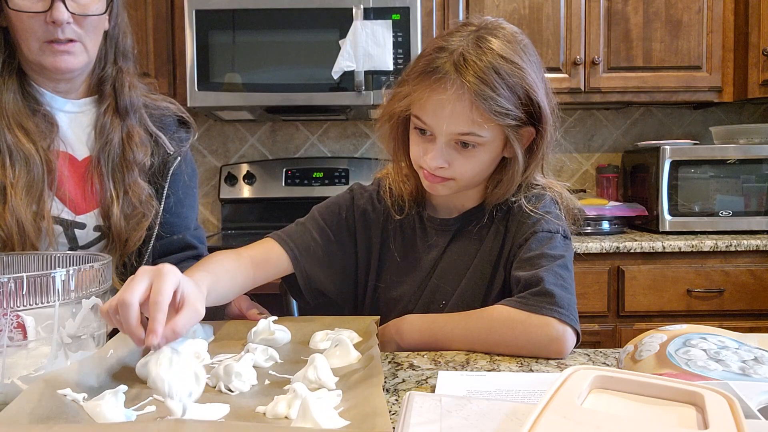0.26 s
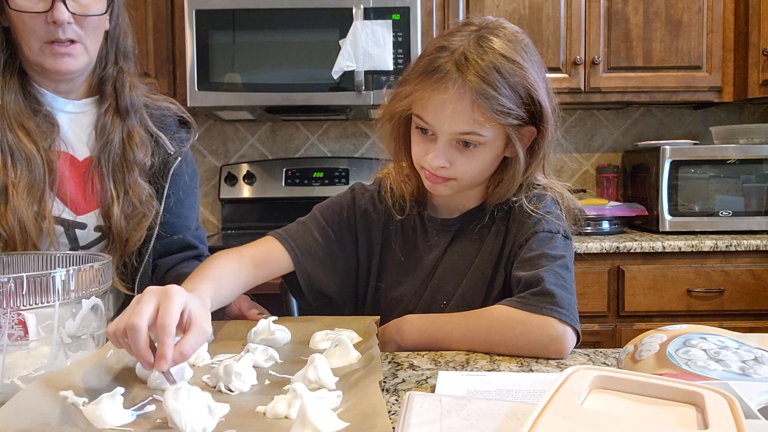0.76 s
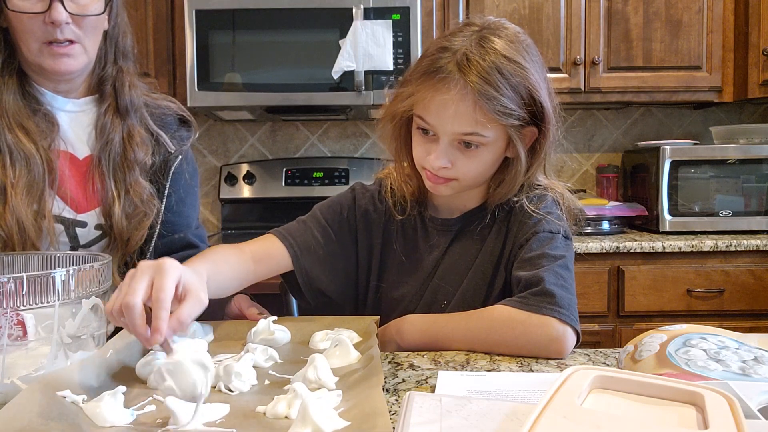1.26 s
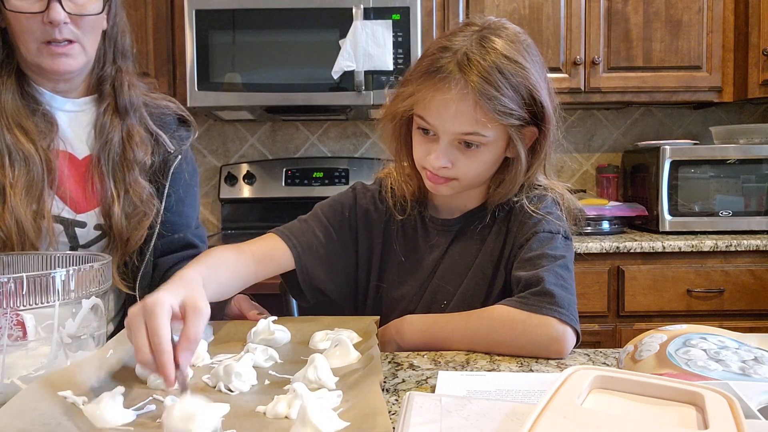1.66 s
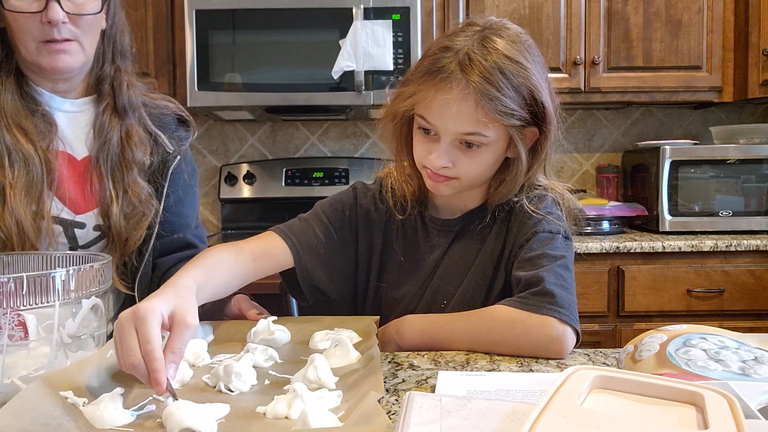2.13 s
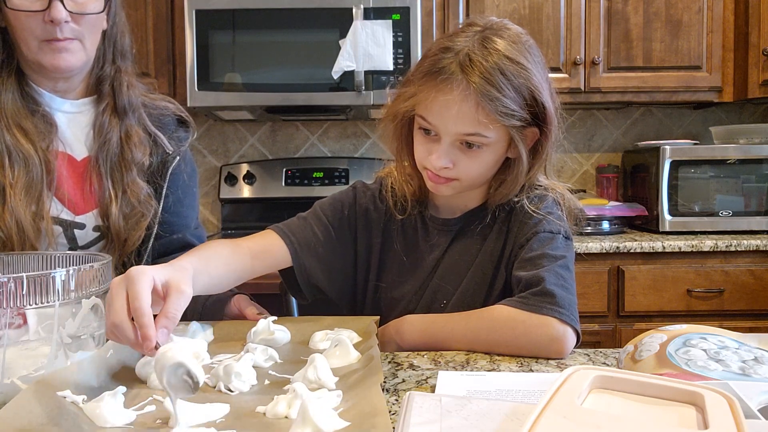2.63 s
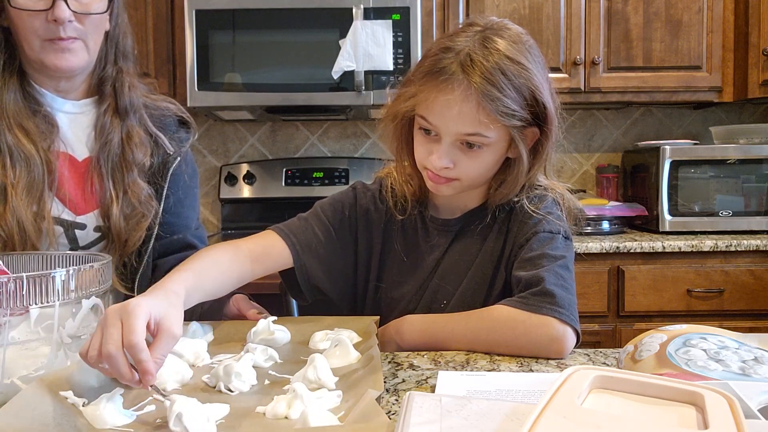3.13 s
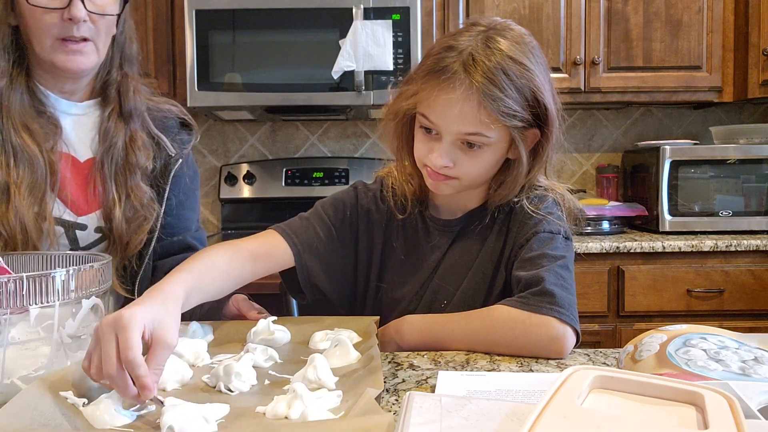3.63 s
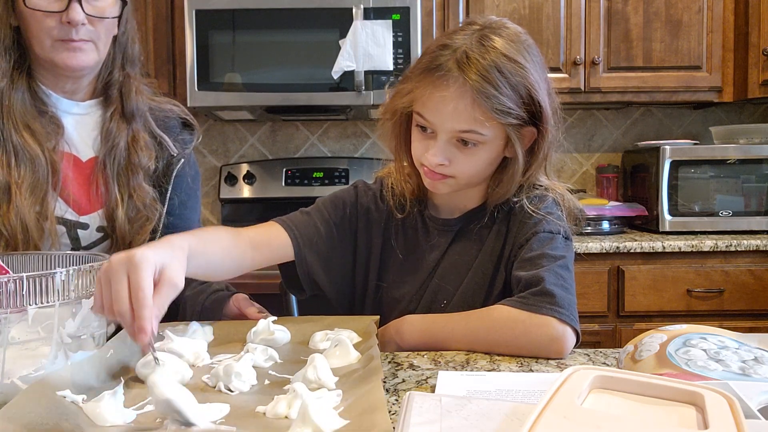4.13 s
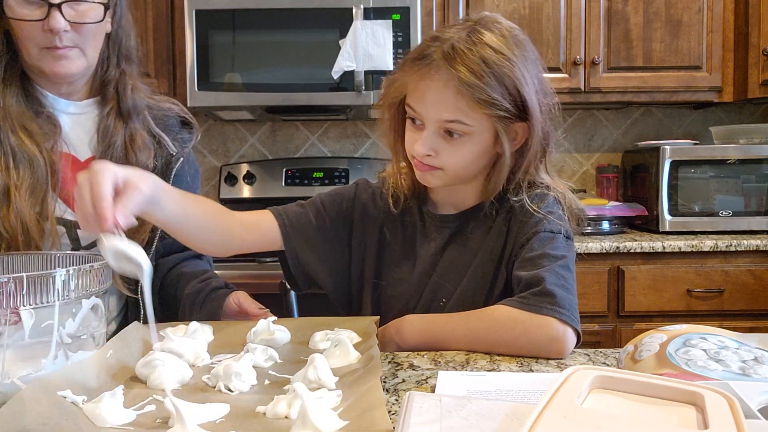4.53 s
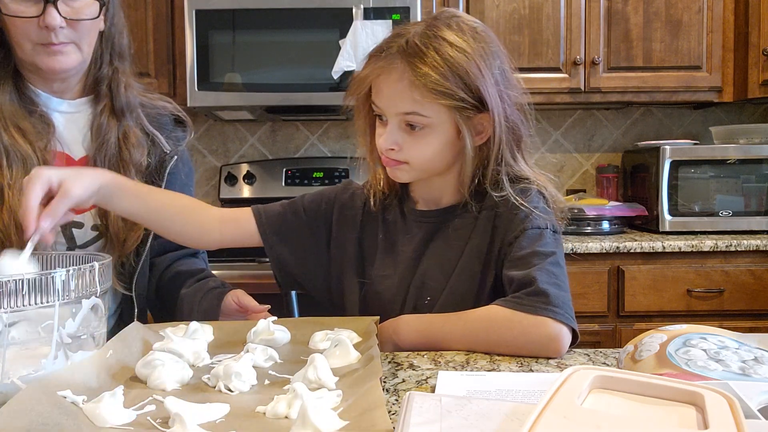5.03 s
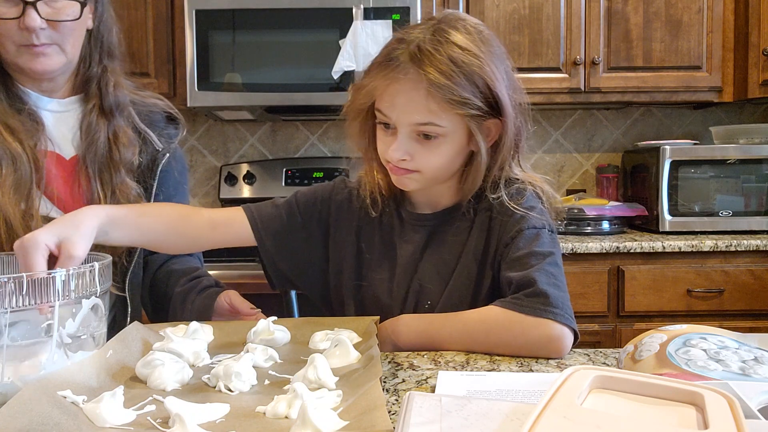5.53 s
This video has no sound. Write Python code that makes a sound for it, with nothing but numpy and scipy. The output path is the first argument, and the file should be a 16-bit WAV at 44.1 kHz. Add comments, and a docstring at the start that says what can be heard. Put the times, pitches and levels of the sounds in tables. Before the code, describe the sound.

Stereo, close microphone in a small, slightly echoing kitchen with a soft appliance hum. Small dry paper crackles come irregularly while a spoon drags over parchment, with one strong damped tap on the metal tray, quieter fidgeting, then several quick lighter taps. A pause follows, then a bright hollow clack of metal spoon on plastic bowl, weak ticks, and a very short faint squeaky rub near the end.

```python
"""A spoon works soft mixture off onto a parchment-lined baking sheet, close by on a kitchen counter.
The paper rustles (resonant crackle) and crinkles (runs of snaps); taps are damped clicks with the
ring of the metal sheet. Then the spoon knocks a plastic bowl, exciting the modes of both, and scrapes
it with a squeak of narrow noise bands. An appliance hums as slowly wavering sines over coloured noise.
Two ports pick up direct sound, a counter bounce and the echoes of the small room."""
import sys
import numpy as np
from scipy import signal
from scipy.fft import rfft, irfft
from scipy.io import wavfile
from scipy.ndimage import uniform_filter1d

SR = 44100
rng = np.random.default_rng(int(sys.argv[2]) if len(sys.argv) > 2 else 0)


def to_wav(sig):
    """Store sig (one row per channel, or 1-D mono) as 16-bit WAV at the path in sys.argv[1].

    Samples outside -1..1 are clipped; the rate is SR.
    """
    pcm = np.clip(np.atleast_2d(sig), -1, 1) * 32767
    pcm = np.round(pcm).astype(np.int16)
    wavfile.write(sys.argv[1], SR, pcm.T)  # frames by channels


N = 254816
TIME = np.arange(N) / SR

# Spectrum of a spoon's impact click. Each row: frequency in Hz, level in dB.
IMPACT_COLOUR = [(50, -37.5), (120, -24), (190, -28.5), (520, -17), (1100, -3), (2000, -2), (2900, -4.5),
                 (4800, -5.5), (7500, -8), (10000, -23), (15500, -27.5)]
# Impacts of the spoon on the bowl. Each row: start in seconds, relative levels of the wall's thud, the
# spoon's clink and the click in dB, tilt of the click in dB per octave, contact length in seconds.
BOWL_IMPACTS = [(5.2435, -34, -12, -13, -3, 0.025), (5.2597, -4, -0.5, -2.5, 6, 0.0049),
                (5.2672, -24, -22, -6.5, -3, 0.0024), (5.481, -33, -55.5, -33, -11.5, 0.0044),
                (5.4914, -26, -50, -21.5, -15, 0.0037), (5.732, -33, -51, -30, -14, 0.0029),
                (5.749, -32.5, -52, -38, -6.5, 0.0057)]


def amp(db):
    """Level as an amplitude ratio: 20 dB is a factor of ten."""
    return 10 ** (np.asarray(db) / 20)


def unit(x):
    """Energy normalisation: the squares sum to one."""
    return x / np.sqrt(np.sum(x ** 2) + 1e-20)


def read(points, hz):
    """Interpolation of a spectrum by straight lines over log frequency."""
    f, value = np.transpose(points)
    return np.interp(np.log(hz + 1), np.log(f), value)


def add(mix, s, sound):
    """Superposition: adds a sound into the mix from s seconds on."""
    part = mix[round(s * SR):][:len(sound)]
    part += sound[:len(part)]


def octaves(hz):
    """Spectral tilt axis: octaves from 2 kHz, held constant beyond 500 Hz and 12 kHz."""
    return np.log2(np.clip(hz, 500, 12000) / 2000)


def snap(colour, tilt_db, peak_hz=1500, peak_db=0, spread_ms=.25, size=2048):
    """Bending-wave dispersion: a causal click with one broad resonance, its treble arriving first."""
    hz = np.fft.fftfreq(size, 1 / SR)
    peak = peak_db / (1 + ((abs(hz) - peak_hz) / (0.14 * peak_hz)) ** 2)
    log_gain = np.log(amp(read(colour, abs(hz)) + tilt_db * octaves(abs(hz)) + peak))
    minimum_phase = np.conj(signal.hilbert(log_gain))
    # phase growing as the root of frequency: spread_ms is the delay at 1 kHz
    bend = 4 * np.pi * spread_ms * np.sign(hz) * np.sqrt(abs(hz) / 1000)
    click = np.fft.ifft(np.exp(minimum_phase - 1j * bend)).real
    return unit(click[:size // 2])


def grains(count, per_s, spread_db):
    """Stick-slip as a random point process: clicks of uneven size over a faint fizz."""
    size = amp(spread_db * np.minimum(rng.exponential(1, count), 4))
    sign = rng.choice([-1, 1], count)
    slips = rng.random(count) < per_s / SR
    return size * sign * (slips + .015)


def wander(step_s):
    """Slow random modulation: a curve that takes a new value every step, joined by lines."""
    knots = np.arange(2000) * step_s
    return np.interp(TIME, knots, rng.standard_normal(len(knots)))


def stroke(start, length):
    """Exponential growth and decay: the rustle swells as the spoon grips, holds, dies as paper relaxes."""
    grip_db_per_s, relax_db_per_s = 599.5, 379.5
    early = np.maximum(start - TIME, 0)
    late = np.maximum(TIME - start - length, 0)
    return amp(-np.minimum(grip_db_per_s * early + relax_db_per_s * late, 200))


def rustle(level_db=0, per_s=220, spread_db=2.0, clump_db=3, shift_db=4, peak_db=8):
    """Resonant filtering of crackle: the spoon drifts over paper patches, each with its own resonance."""
    # Spectrum of the spoon rubbing on paper. Each row: frequency in Hz, level in dB.
    rub_colour = [(60, -33.5), (200, -11), (600, -7), (1000, -4), (1450, -1), (2000, -4.5), (2700, -10.5),
                  (4200, -7.5), (7300, -14), (10000, -29), (15500, -34)]
    # Strokes of the sticky spoon dragging the paper. Each row: start in seconds, length in seconds,
    # relative level in dB, extra level of the treble in dB.
    drags = [(0, 0.011, -54, -1), (0.075, .05, -53, 0.5), (.17, 0.11, -49, 1.5), (0.373, 0.17, -47, -1.5),
             (0.601, 0.02, -51, -6), (0.783, 0.071, -50, -1.5), (0.937, 0.041, -49.5, -9.5),
             (0.99, 0.068, -44.5, 3.5), (1.118, 0.036, -46.5, 1), (1.214, 0.095, -69, -4),
             (1.374, 0.0057, -54, -5.5), (1.667, .024, -41, -3), (1.762, 0.1, -63, -7),
             (1.893, 0.012, -51, -0.5), (1.979, 0.015, -54, -2), (2.188, .025, -55.5, -2),
             (2.222, .07, -46.5, -1), (2.412, 0.019, -57, -1.5), (2.598, 0.042, -49.5, 0),
             (2.674, 0.018, -45.5, -1.5), (2.951, 0.071, -45, -1.5), (3.08, .08, -67, -3.5),
             (3.552, .05, -64, -3.5), (3.709, 0.029, -56.5, 2.5), (3.909, 0.065, -57.5, -2.5),
             (3.96, .12, -53, -1), (4.112, 0.033, -45.5, -0.5), (4.381, 0.031, -59.5, -12),
             (4.433, 0.027, -53, -0.5), (4.498, 0.054, -59.5, 2)]
    treble_hz = 2800  # above this lies the crisp part of the rustle

    clumps = amp(clump_db * wander(0.0096))
    crackle = 0
    for patch_hz in np.geomspace(1000, 3400, 6):
        slips = grains(N, per_s, spread_db) * clumps * amp(shift_db * wander(.04))
        crackle = crackle + signal.oaconvolve(slips, snap(rub_colour, 0, patch_hz, peak_db))[:N]
    # level out the power over 1500 samples, so that the strokes set the loudness
    crackle = crackle / np.sqrt(abs(uniform_filter1d(crackle ** 2, size=1500)) + 1e-12)
    body = signal.sosfiltfilt(signal.butter(2, treble_hz, fs=SR, output="sos"), crackle)
    treble = crackle - body
    body_gain = treble_gain = 0
    for start, length, db, treble_db in drags:
        gain = amp(db + level_db) * stroke(start, length)
        body_gain = np.maximum(body_gain, gain)
        treble_gain = np.maximum(treble_gain, gain * amp(treble_db))
    return body_gain * body + treble_gain * treble


def crinkles(level_db=-2.0, per_s=2200, spread_db=3, fade_db=4, rise_s=0.0035, peak_db=6):
    """Buckling: each crease gives way in a run of snaps that builds quickly and fades, at its own pitch."""
    # Spectrum of the paper's snaps. Each row: frequency in Hz, level in dB.
    paper_colour = [(50, -18), (120, -8), (600, -4), (1300, 2), (2000, -4), (2700, -6), (4000, -3.5),
                    (6500, -4), (10000, -18), (15500, -26.5)]
    # Creases that buckle. Each row: start in seconds, length in seconds, relative level in dB,
    # tilt in dB per octave.
    creases = [(0.08, 0.04, -32, -0.1), (0.12, 0.011, -30.5, -3), (0.166, 0.012, -38, -2.5),
               (0.243, 0.0047, -43.5, 2), (0.278, 0.01, -38, 0), (0.364, 0.0043, -39.5, -2),
               (0.381, 0.0079, -43, -1), (0.442, 0.013, -32, -1.5), (0.452, 0.0079, -38, -2.5),
               (0.494, 0.0067, -39, 0.5), (0.592, 0.0034, -47, -2), (0.761, 0.013, -32, 0.4),
               (0.775, 0.011, -41.5, 0), (0.979, 0.02, -26.5, 1), (1.002, 0.0043, -28, 0),
               (1.009, 0.0089, -27, -3.3), (1.021, 0.0061, -30.5, -1.5), (1.044, 0.012, -39, -0.5),
               (1.895, 0.0096, -47.5, -0.5), (1.968, 0.012, -49.5, -5.5), (2.27, 0.0076, -39.5, 1.3),
               (2.407, 0.0055, -44, -0.9), (2.62, 0.0067, -44.5, -2), (2.672, 0.0058, -42.5, 7.5),
               (2.934, 0.0075, -35, -0.9), (2.954, 0.0081, -39.5, -0.5), (2.964, 0.016, -37.5, 0.5),
               (2.996, 0.014, -35, -2), (3.921, 0.0015, -47.5, 7), (4.072, 0.0049, -46, 1),
               (4.095, 0.0034, -43.5, 3), (4.427, 0.0057, -41, 2.5), (4.518, 0.0044, -47, -2)]
    out = np.zeros(N)
    for s, length, db, tilt_db in creases:
        count = max(int(length * SR), 8)
        swell = (1 - np.exp(-TIME[:count] / rise_s)) * amp(-fade_db * np.linspace(0, 1, count))
        run = grains(count, per_s, spread_db) * swell
        crease = snap(paper_colour, tilt_db, rng.uniform(1100, 2200), peak_db)
        sound = unit(signal.fftconvolve(run, crease))
        add(out, s, amp(db + level_db) * np.sqrt(count) * sound)
    return out


def ring(modes):
    """Modal decay: a sum of half-second dying sines, neighbouring modes swinging in opposite senses."""
    t = TIME[:SR // 2]
    total = 0
    for k, (hz, db, t60) in enumerate(modes):
        total = total + (-1) ** k * amp(db - 60 * t / t60) * np.sin(2 * np.pi * hz * t)
    return total


def contact(length, chatter):
    """Impact force: a first blow and a brief random chatter."""
    count = max(int(length * SR), 4)
    force = chatter * unit(rng.standard_normal(count) * np.linspace(1, .3, count))
    force[0] += 1
    return unit(force)


def taps(ring_db=-43, chatter=0.98, level_db=-3, peak_db=8, boom_db=-46):
    """Impact excitation of a plate: a click damped by the paper, and the ring of the metal beneath."""
    # Impacts of the spoon on the sheet. Each row: start in seconds, relative level in dB, tilt in dB per
    # octave, contact length in seconds, sheet ring in dB, resonance of the struck spot in Hz.
    impacts = [(1.709, 7.5, -3.8, 0.00036, 2.5, 1074), (1.713, -5, -3.5, 0.00068, -12.5, 2270),
               (2.0948, -24.5, -5, 0.0016, -12, 4780), (2.116, -22.5, -5.5, 0.00049, -16, 4480),
               (2.548, -30, -1.5, 0.0019, -16, 1600), (3.589, -32, -6, 0.0059, -22.5, 1450),
               (3.7033, -15.5, -3.5, 0.0014, -9.5, 1046), (3.7436, -7, 1, 0.0011, -15, 1525),
               (3.7452, -0.5, -1, 0.00089, -15.5, 8040), (3.758, -7, 1, 0.00048, -28, 1560),
               (3.9589, -8.5, -1.5, 0.00039, -28, 1350), (3.969, -29.5, 1, .0003, -21, 1250)]
    # Modes of the baking sheet. Each row: frequency in Hz, level in dB, 60 dB decay time in seconds.
    sheet_modes = [(112, -9, .25), (131, -4, .38), (238, -3, .1), (290, -3, .09), (360, -1, .07),
                   (450, 2, .05), (517, 6, .07), (768, 7, .06), (951, 2, .05), (1032, 3, .05),
                   (1612, -3, .08), (1759, -2, .09), (1822, -3, .1), (2029, -2, .1), (2151, -5, .1),
                   (2222, -5, .1), (2358, 1, .14), (2444, -2, .12), (3152, -7, .1), (3467, -8, .08),
                   (3900, -5, .05), (4450, -4, .05), (4950, -2, .05), (5400, -4, .05)]
    out, sheet = np.zeros(N), ring(sheet_modes)
    for s, db, tilt_db, length, sheet_db, spot_hz in impacts:
        click = signal.fftconvolve(contact(length, chatter), snap(IMPACT_COLOUR, tilt_db, spot_hz, peak_db))
        add(out, s, amp(db + level_db) * unit(click))
        add(out, s, amp(db + sheet_db + ring_db) * sheet)
    add(out, 0, amp(boom_db) * ring(sheet_modes[1:2]))  # at first the sheet still booms from being pressed
    return out


def diffuse(a, b):
    """Interchannel coherence: two unrelated signals become a pair whose likeness depends on frequency."""
    # Likeness of the two channels in diffuse sound. Each row: frequency in Hz, coherence from 0 to 1.
    coherence = [(100, 0.91), (600, 0.65), (1300, 0), (2500, 0.06), (5000, 0.6)]
    same = np.clip(read(coherence, np.fft.rfftfreq(len(a), 1 / SR)), 0, 1)
    partner = irfft(same * rfft(a) + np.sqrt(1 - same ** 2) * rfft(b), len(a))
    return np.array([a, partner])


def background(air_db=-59.5, waver=0.18):
    """Steady tones in broadband noise: mains and motor hum over the soft rush of the room."""
    # Spectrum of the room air. Each row: frequency in Hz, relative level in dB.
    air_colour = [(20, -17), (50, -6), (85, -2.5), (125, -1), (160, -2.5), (250, -0.5), (350, -9),
                  (500, -16), (700, -17), (1100, -26), (2500, -33.5), (5500, -42.5), (7800, -35),
                  (9500, -57), (16000, -58.5)]
    # Tones of the appliance. Each row: frequency in Hz, rms level in dB before the waver.
    hum_tones = [(59.4, -58.5), (112, -64.5), (119, -74), (177.7, -74.5), (237.3, -66), (296.1, -88),
                 (355.5, -76), (446.8, -77.5)]
    colour = amp(read(air_colour, np.fft.rfftfreq(N, 1 / SR)))
    air = diffuse(*[unit(irfft(rfft(rng.standard_normal(N)) * colour, N)) for side in range(2)])
    hum = 0
    for hz, db in hum_tones:
        drift = np.interp(TIME, np.linspace(0, TIME[-1], 30), rng.standard_normal(30))
        tone = np.sin(2 * np.pi * (hz * TIME + rng.random()))
        hum = hum + amp(db) * np.sqrt(2) * (1 + waver * drift) * tone
    return amp(air_db) * np.sqrt(N) * air + hum


def knocks(spoon_db=-40, crack_db=-0.4, chatter=1.64):
    """Impact excitation of modes: the spoon chatters against the bowl and clinks."""
    # Modes of the spoon. Each row: frequency in Hz, level in dB, 60 dB decay time in seconds.
    spoon_modes = [(2571, -7, .08), (2724, -7, .12), (3248, -6, .1), (3860, -9, .1), (4323, -6, .2),
                   (4673, -8, .18), (4813, -8, .15), (4995, -3, .08), (5542, -6, .08), (6417, -7, .12),
                   (6742, -2, .2), (7127, 2, .2), (7381, -6, .18), (7833, -11, .2), (8597, -13, .25),
                   (9100, -13, .14), (9690, -7, .16), (10020, -10, .16), (10700, -15, .18),
                   (11900, -12, .2), (12240, -10, .2), (12910, -11, .08), (14350, -13, .12)]
    out, spoon = np.zeros(N), ring(spoon_modes)
    for s, _, clink_db, click_db, tilt_db, length in BOWL_IMPACTS:
        clink = signal.fftconvolve(contact(length, chatter), spoon)
        add(out, s, amp(spoon_db + clink_db) * clink)
        click = signal.fftconvolve(contact(length, 2.8), snap(IMPACT_COLOUR, tilt_db))
        add(out, s, amp(crack_db + click_db) * unit(click))
    return out


def thuds(level_db=-16.0):
    """Modal response of a shell: the bowl's plastic wall answers each knock with a hollow note."""
    # Modes of the bowl's wall. Each row: frequency in Hz, level in dB, 60 dB decay time in seconds.
    wall_modes = [(501, 3, 0.051), (556, 6, 0.037), (533, -23, 0.19), (663, -23.5, 0.027),
                  (1432, -17, 0.14)]
    out, wall = np.zeros(N), ring(wall_modes)
    for s, thud_db, *_ in BOWL_IMPACTS:
        add(out, s, amp(level_db + thud_db) * wall)
    return out


def squeak(width_hz=130, level_db=-5):
    """Frictional excitation: rubbing keeps narrow resonances singing, as sines with random envelopes."""
    # Course of the spoon rubbing down the bowl's wall. Each row: time in seconds, relative level in dB,
    # tilt in dB per octave about 4 kHz.
    course = [(5.661, -91, -1.5), (5.694, -69.5, -5), (5.712, -69.5, 14.5), (5.735, -74.5, -3),
              (5.751, -57, -9), (5.78, -88, -10)]
    # Tones of the squeak. Each row: frequency in Hz, relative level in dB.
    tones = [(950, -11.5), (1281, -6), (2229, 2), (3380, -5), (4759, -1.5), (5900, -0.5), (6772, -6),
             (8027, -7), (9550, -20.5), (10745, -38), (12000, -35), (14573, -36)]
    s, db, tilt = np.transpose(course)
    t = TIME[TIME > s[0]]
    r = np.exp(-np.pi * width_hz / SR)  # radius of the double pole that narrows the noise
    total = 0
    for hz, mode_db in tones:
        noise = rng.standard_normal(len(t)) + 1j * rng.standard_normal(len(t))
        envelope = unit(signal.lfilter([1], [1, -2 * r, r * r], noise))
        gain = amp(mode_db + np.interp(t, s, tilt) * octaves(hz / 2))
        total = total + gain * (envelope * np.exp(2j * np.pi * hz * t)).real
    total = total * np.sqrt(len(t)) * amp(np.interp(t, s, db) + level_db)
    return np.pad(total, (N - len(t), 0))


def ports(x, lag_ms, bounce, bounce_ms, left_db):
    """Arrival-time difference: direct sound and its counter bounce reach the left port slightly later."""
    turn = -2j * np.pi * np.fft.rfftfreq(N, 1 / SR) / 1000  # phase per millisecond of delay
    left = amp(left_db) * np.exp(turn * lag_ms) * (1 + bounce * np.exp(turn * (bounce_ms + lag_ms / 2)))
    right = amp(-left_db) * (1 + bounce * np.exp(turn * bounce_ms))
    return irfft(rfft(x) * np.array([left, right]), N) / np.sqrt(1 + bounce ** 2)


def kitchen(x, close_db, early_db, early_t60, tail_db, close_t60=0.014):
    """Reverberation: scatter from things on the counter, early cupboard echoes, then the room's tail."""
    # Decay of the kitchen. Each row: frequency in Hz, 60 dB decay time in seconds.
    decay = [(150, .3), (600, 0.38), (1500, 0.32), (4000, 0.37), (8000, 0.22), (15000, 0.28)]
    t = TIME[:SR // 2]
    # small things scatter only treble, hence the differenced noise
    close = np.diff(rng.standard_normal((2, len(t) + 1))) * amp(-60 * t / close_t60) * (t > .0004)
    early = diffuse(*rng.standard_normal((2, len(t)))) * amp(-60 * t / early_t60) * (t > .002)
    hz, frames, z = signal.stft(diffuse(*rng.standard_normal((2, len(t)))), SR, nperseg=256)
    fading = z * amp(-60 * frames / read(decay, hz)[:, None])
    tail = signal.istft(fading, SR, nperseg=256)[1][:, :len(t)]
    tail = tail * np.minimum(t / 0.0085, 1)  # the tail builds up over 8.5 ms
    response = amp(close_db) * unit(close) + amp(early_db) * unit(early) + amp(tail_db) * unit(tail)
    return signal.fftconvolve(x[None], np.sqrt(2) * response, axes=1)[:, :N]


def scene():
    """Superposition of direct sound, echoes and background at the two ports."""
    tray = rustle() + crinkles() + taps()
    spoon = knocks() + squeak()
    wall = thuds()
    tray_near = ports(tray, lag_ms=0.053, bounce=0.2, bounce_ms=0.6671, left_db=-1.03)
    bowl_near = ports(spoon + wall, lag_ms=0.1888, bounce=1.0, bounce_ms=0.279, left_db=-1.0)
    tray_room = kitchen(tray, close_db=2.5, early_db=-6.5, early_t60=0.1, tail_db=-14)
    # the wall faces the microphone, so it sends less into the room
    bowl_room = kitchen(spoon + amp(-1.5) * wall, close_db=1.0, early_db=-5.5, early_t60=0.075, tail_db=-8.5)
    right_db = 1  # the echoes lean to the right
    echoes = (tray_room + bowl_room) * amp([[-right_db], [right_db]])
    return tray_near + bowl_near + echoes + background() * amp([[-.35], [.35]])


def record(dry):
    """Band limitation: the recorder's linear-phase low-pass."""
    edge_hz = 16200
    lowpass = signal.firwin(511, edge_hz, window=("kaiser", 9), fs=SR)
    return signal.oaconvolve(dry, lowpass[None], "same")


dry = scene()
out = record(dry)
to_wav(out)
```